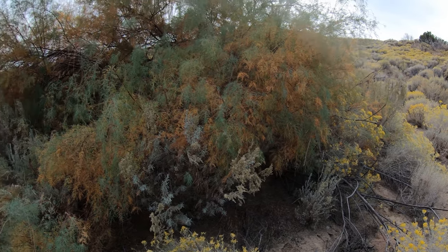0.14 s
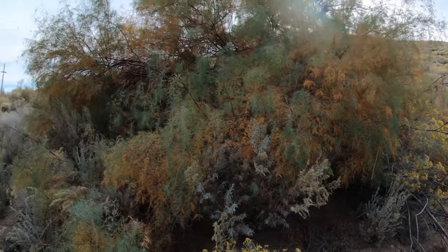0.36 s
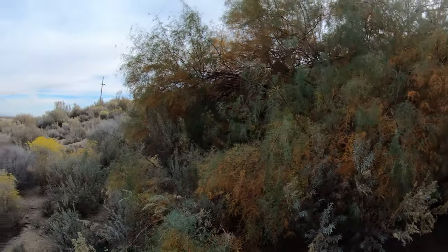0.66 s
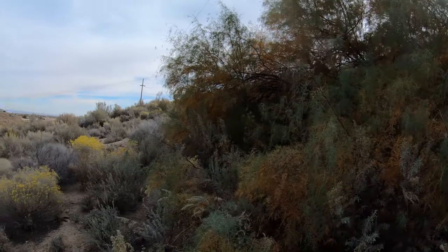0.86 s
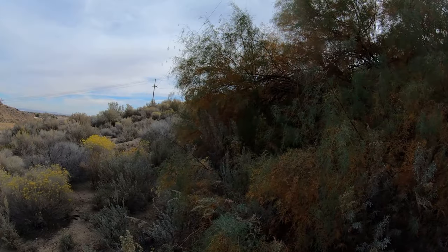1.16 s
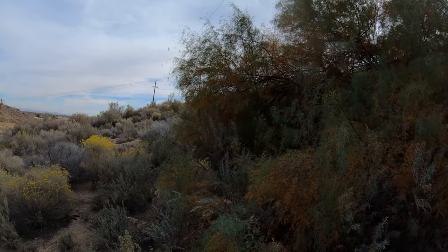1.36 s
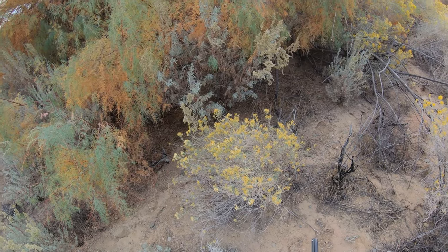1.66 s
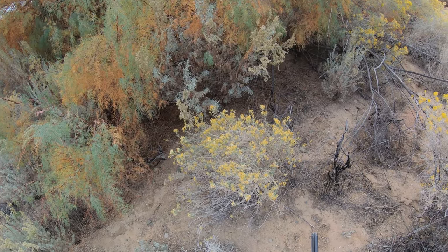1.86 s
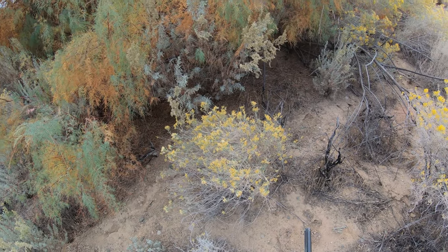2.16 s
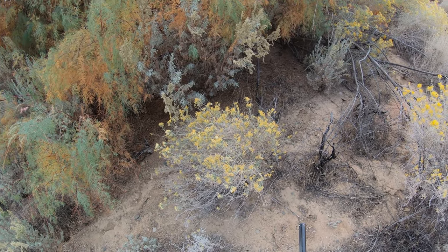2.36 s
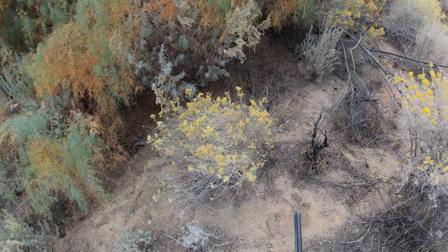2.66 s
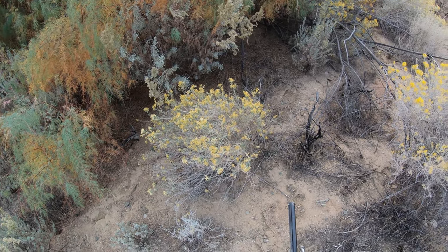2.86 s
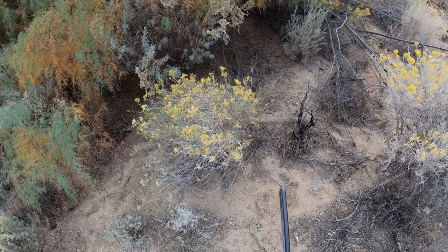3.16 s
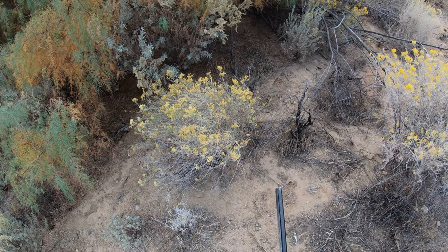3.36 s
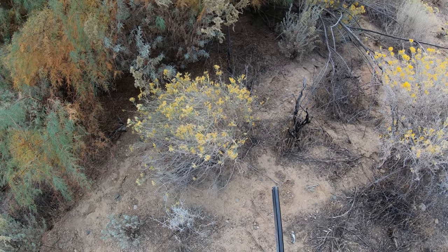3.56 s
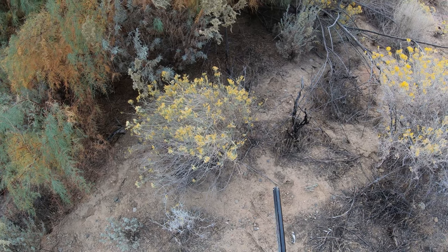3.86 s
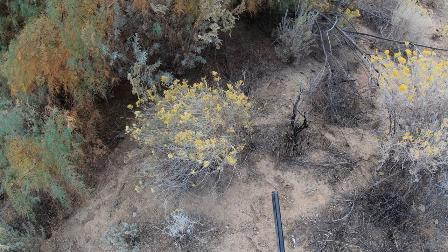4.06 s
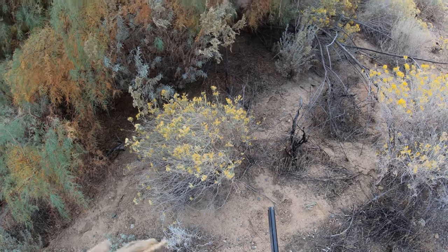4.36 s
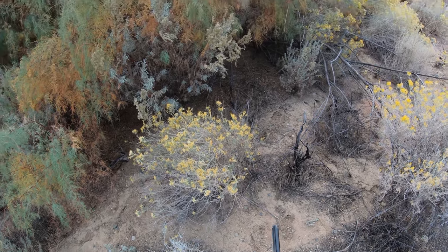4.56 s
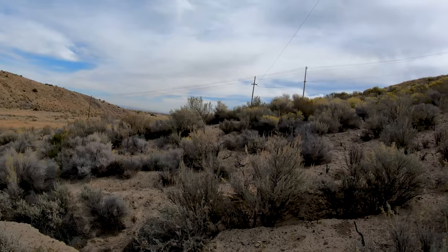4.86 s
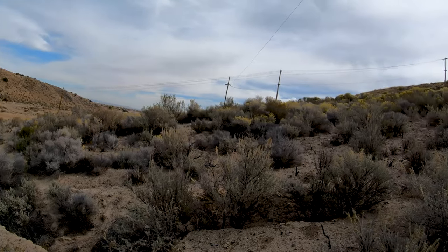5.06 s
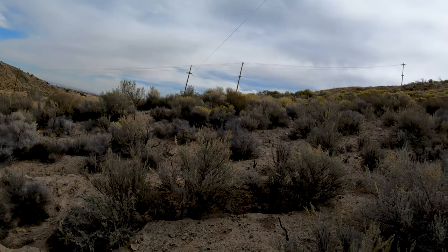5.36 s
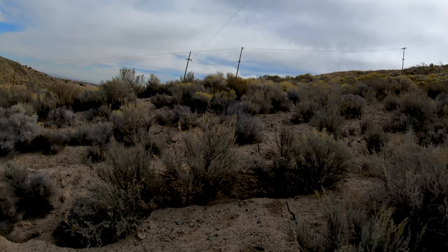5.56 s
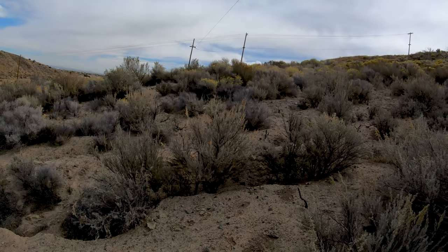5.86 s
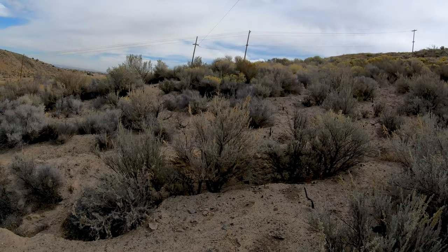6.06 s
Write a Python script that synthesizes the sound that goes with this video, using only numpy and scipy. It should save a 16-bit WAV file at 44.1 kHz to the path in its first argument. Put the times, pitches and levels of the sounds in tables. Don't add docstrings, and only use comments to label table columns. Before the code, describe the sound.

Three joined outdoor scenes with quail in bushes. Early notes are soft, the middle scene holds the clearest arched whistles, and the last has only faint, lower calls. Wind buffets the microphone steadily, with a heavy push near the end. Far traffic hums below thin leaf hiss. Close by, dry twigs snap, cloth brushes stems, and the housing ticks and thumps, mostly after four seconds.

```python
import sys
import numpy as np
from scipy import signal
from scipy.fft import rfft, irfft
from scipy.io import wavfile
from scipy.ndimage import uniform_filter1d

SR = 44100
rng = np.random.default_rng(int(sys.argv[2]) if len(sys.argv) > 2 else 0)


def waveform_to_disk(signal):
    frames = np.transpose(np.atleast_2d(signal))
    scaled = np.clip(frames, -1, 1) * 32767
    samples = np.round(scaled).astype(np.int16)
    wavfile.write(sys.argv[1], SR, samples)


def to_linear_factor(level_db):
    exponent = np.asarray(level_db, float) / 20
    return 10 ** exponent


N = 274302


def level(x, db):
    return x * to_linear_factor(db) / np.sqrt(np.mean(x ** 2))


def shaped(points, lo_hz, hi_hz):
    f = np.fft.rfftfreq(N, 1 / SR) + 0.18
    point_hz, point_db = np.array(points, float).T
    gain = to_linear_factor(np.interp(np.log(f), np.log(point_hz), point_db))
    gain = gain / np.sqrt((1 + (lo_hz / f) ** 8) * (1 + (f / hi_hz) ** 8))
    return level(irfft(rfft(rng.standard_normal(N)) * gain, N), 0)


def walk(rate, n):
    hold = int(SR / rate)
    steps = np.repeat(rng.standard_normal(n // hold + 1), hold)
    return 1.12 * uniform_filter1d(uniform_filter1d(steps, hold), hold)[:n]


def band(x, hz, width_hz):
    lo = max(hz - width_hz / 2, hz / 5)
    hi = min(hz + width_hz / 2, .45 * SR)
    return signal.sosfilt(signal.butter(2, [lo, hi], "band", fs=SR, output="sos"), x)


def add(out, x, s):
    i = max(int(s * SR), 0)
    out[i:i + len(x)] += x[:N - i]


# t/s, step in signal level
SPLICES = [
    (1.596, .01),
    (4.849, -.016),
]


def splices():
    out, t = np.zeros(N), np.arange(N) / SR
    for s, step in SPLICES:
        out += step * (t >= s) * np.exp(-np.abs(t - s) / 0.016)
    return out


def spans():
    cuts = [0] + [s for s, _ in SPLICES] + [np.inf]
    return list(zip(cuts, cuts[1:]))


# f/Hz, level/dB per Hz
AIR_FIRST = [(18, -44), (30, -6.5), (75, -1.5), (167, -18), (322, -26.5), (429, -31), (476, -31),
             (608, -31.5), (916, -22), (1350, -25.5), (1880, -34), (4000, -53), (5200, -87), (8800, -120)]
AIR_SECOND = [(18, -22), (30, 3), (71, -2), (139, -6), (189, -18), (247, -23), (350, -27.5), (457, -25.5),
              (827, -20), (1320, -23.5), (1660, -26), (4000, -44.5), (5200, -81), (8800, -120)]
AIR_THIRD = [(18, -31), (30, -12), (55, -3.5), (71, -8.5), (193, -22.5), (237, -27.5), (297, -30),
             (372, -29), (844, -24), (935, -19.5), (1410, -20.5), (4000, -41), (5200, -73), (8800, -120)]
AIR = (AIR_FIRST, AIR_SECOND, AIR_THIRD)
# t/s, level/dB
ROAD = [
    [(0, -48.5), (.06, -55.5), (.42, -56), (.54, -50.5), (.9, -54.5), (1.2, -54.5), (1.59, -54.5)],
    [(1.59, -54.5), (2.14, -52), (2.6, -54), (2.9, -56), (3.3, -53.5), (3.68, -57), (4.05, -54.5),
     (4.7, -57)],
    [(4.85, -50), (5.36, -54), (5.85, -51), (6.05, -52.5)],
]


def road():
    out, t = np.zeros(N), np.arange(N) / SR
    for curve, colour, (start, end) in zip(ROAD, AIR, spans()):
        road_db = np.interp(t, *np.transpose(curve))
        hum = to_linear_factor(road_db - 1.5 + 0.4 * walk(6, N)) * shaped(colour, 246, 1355)
        tyres = to_linear_factor(road_db - 10 + 0.76 * walk(5.69, N)) * shaped(colour, 1676, 3500)
        out += (hum + tyres) * ((t >= start) & (t < end))
    return out


# f/Hz, level/dB per Hz
HISS = [(1470, -37), (2500, -12), (2980, -7), (4230, -7), (15000, -12.5), (15500, -12.5)]
LEAVES_DB = (-69.5, -69, -68)
LEAF_SHARE, ROAD_MEAN_DB = 0.084, -54


def leaves():
    out, t = np.zeros(N), np.arange(N) / SR
    for leaves_db, curve, (start, end) in zip(LEAVES_DB, ROAD, spans()):
        road_db = np.interp(t, *np.transpose(curve))
        hiss_db = leaves_db + LEAF_SHARE * (road_db - ROAD_MEAN_DB)
        hiss = to_linear_factor(hiss_db + 0.5 + 0.81 * walk(14, N)) * shaped(HISS, 2860, 20200)
        out += hiss * ((t >= start) & (t < end))
    return out


# t/s, level/dB
WIND = [
    [(0, -43.5), (.5, -39.5), (1.2, -45), (1.43, -43.5), (1.59, -43.5)],
    [(1.59, -41), (1.7, -39.5), (1.87, -41.5), (2.1, -41), (2.9, -40.5), (3.6, -42), (3.85, -44),
     (4.7, -43.5), (4.85, -47.5)],
    [(4.85, -43), (5.08, -51), (5.34, -47), (6.22, -49.5)],
]
# t/s, half length/s, level/dB
GUSTS = [(0, 0.66, -35.5), (1.05, 0.48, -43.5), (1.486, 0.078, -38), (1.98, .2, -44), (2.55, 0.21, -42.5),
         (2.937, .08, -44), (3.678, 0.074, -45), (4.27, 0.27, -41.5), (4.954, 0.17, -39), (5.33, 0.18, -37),
         (5.808, 0.39, -28.5), (6.2, .15, -40.5)]
CALM_DB = -51


def wind():
    out, t = np.zeros(N), np.arange(N) / SR
    swell = to_linear_factor(CALM_DB)
    for s, half, db in GUSTS:
        swell = swell + to_linear_factor(db) * np.cos(np.pi / 2 * np.clip((t - s) / half, -1, 1)) ** 2
    for curve, colour, (start, end) in zip(WIND, AIR, spans()):
        rumble_db = np.interp(t, *np.transpose(curve))
        heave = shaped([(2, -1.0), (10, 1.0), (30, -15)], 1.21, 26.6)
        blow = swell * to_linear_factor(2.5) * np.tanh(heave)
        blow += to_linear_factor(rumble_db - 1.5 + 1.0 * walk(9, N)) * shaped(colour, 28.0, 278)
        out += blow * np.clip(np.minimum(t - start, end - t) / 0.0038, 0, 1)
    return out


# centre t/s, half length/s, level/dB, centre f/Hz, width f/Hz
RUSTLES = [(0.22, .03, -70, 5530, 2520), (0.597, 0.28, -68.5, 2600, 1500), (1.237, .13, -75, 5500, 1500),
           (1.656, .14, -69.5, 4470, 3000), (2.13, 0.096, -69.5, 7000, 6000),
           (3.206, 0.035, -71, 6460, 1200), (3.575, 0.022, -69.5, 6000, 1200),
           (3.741, 0.07, -68, 5030, 4000), (3.83, 0.044, -74, 7500, 1500),
           (4.253, 0.062, -69.5, 5840, 2000), (5.605, 0.02, -67.5, 4500, 3500),
           (6.204, .03, -63.5, 4000, 3000), (5.7, .05, -69, 6000, 5000), (5.823, 0.045, -62.5, 4750, 5000)]


def rustles():
    out = np.zeros(N)
    for s, length, db, hz, width_hz in RUSTLES:
        n = int(2 * length * SR)
        grains = rng.standard_normal(n) * to_linear_factor(5.1 * walk(300, n))
        add(out, level(band(grains, hz, width_hz), db) * np.hanning(n), s - length)
    return out


def ticks(table):
    out, t = np.zeros(N), np.arange(2048) / SR
    for s, db, hz, share, ring in table:
        noise = rng.standard_normal(len(t))
        push = noise * to_linear_factor(-60 * t / max(ring, .001)) + 7.1 * (t == 0)
        snap = band(push, hz, hz * np.clip(share, .08, 1.6))
        add(out, snap * to_linear_factor(db) / np.abs(snap).max(), s)
    return out


# t/s, peak level/dB, centre
# f/Hz, width as share of centre, ring/s
KNOCKS = [(3.866, -45, 1000, .5, .015), (4.782, -38, 1100, .3, .015), (5.82, -40, 800, 1.2, .012),
          (5.797, -43, 600, .9, .015), (5.253, -41, 780, .3, .025), (5.504, -40, 480, .9, .03),
          (1.596, -50, 400, 1.2, .02)]


def knocks():
    return ticks(KNOCKS)


# t/s, peak level/dB, centre f/Hz, width as share of centre
PINGS = [(1.597, -52.5, 3900, .15), (2.78, -51, 4400, .3), (3.8668, -49.5, 5200, .1),
         (3.867, -49, 3180, 0.27), (4.1045, -53, 5100, .3), (4.4437, -45, 7800, 0.32),
         (4.47, -56, 4800, .3), (4.548, -51, 4600, 0.2), (4.548, -51, 7300, 0.26), (4.739, -56, 7500, 0.27),
         (4.748, -58, 7500, .15), (4.753, -59, 7500, .15), (4.782, -38, 6300, .35),
         (4.7825, -46.5, 9800, 0.25), (4.797, -47, 6700, .36), (4.831, -48, 7600, .4),
         (5.204, -51, 4100, .2), (5.208, -50, 5000, .15)]
PING_RING_S = 0.011


def fittings():
    return ticks([(*row, PING_RING_S) for row in PINGS])


# t/s, peak level/dB, centre f/Hz
SNAPS = [(.8105, -50, 3300), (2.122, -56, 4000), (4.217, -53, 6000), (4.4072, -35.5, 10700),
         (4.4575, -54, 9000), (4.4705, -55, 8000), (4.539, -54, 7000), (4.568, -44, 7000),
         (4.59, -47, 4760), (4.559, -50, 3300), (4.8035, -48, 9000), (4.819, -50, 7500),
         (4.8472, -45, 8000), (5.596, -52, 4300), (5.608, -54, 4500), (5.711, -45, 3970), (5.75, -49, 5500),
         (5.799, -52, 4500), (5.813, -49, 4600), (5.83, -43, 5470)]
SNAP_SHARE, SNAP_RING_S = .55, .005


def twigs():
    return ticks([(*row, SNAP_SHARE, SNAP_RING_S) for row in SNAPS])


def ease(u, bend):
    u = np.clip(u, 0, 1) ** 2
    return u / (1 - bend * (1 - u))


ATTACK_S, EDGE_DB, DULL_DB = .009, 13, 4


def arch(shape, start, top, end, top_hz, db):
    rise, rise_bend, fall, fall_bend, sag_db, release = shape
    t = np.arange(start, end, 1 / SR)
    up = ease((top - t) / (top - start), rise_bend)
    down = ease((t - top) / (end - top), fall_bend)
    edge = np.clip(np.minimum((t - start) / ATTACK_S, (end - t) / release), 0, 1)
    hz = top_hz * (1 - rise * up - fall * down)
    loud_db = db - sag_db * (up + down) - EDGE_DB * (1 - edge)
    return hz, loud_db, -DULL_DB * (up + down)


# f/Hz, level/dB
THROAT = [(600, -15), (1000, -5), (1200, -3), (1600, -2), (2300, 0), (2800, -10), (3500, -13), (4000, -26),
          (4700, -25), (5200, -24), (5800, -6), (6100, -12), (6500, -26), (7100, -24)]
# start drop as share, rise ease, end drop as share, fall ease, sag level/dB, release/s
CHIP = (.4, .35, .38, .25, 10, .008)
SLOWER = (.29, .5, .25, -2.5, 5, .006)
DIP = (.02, .2, .17, .5, 1, .008)
LONG = (.41, -.6, .36, -3.6, 8, .005)
TAIL = (.36, .45, .33, .89, 7, .02)
HIGH = (.25, -.3, .33, .5, 11, .012)
FAR = (.34, -.3, .24, -.3, 7, .02)
HELD = (.33, -1.8, .065, .6, 4, .004)
SLUR = (.08, .2, .39, .8, 4, .015)
DROOP = (.03, .2, .14, .3, 1, .03)
# arch, start t/s, top t/s, end t/s, top f/Hz, second partial level/dB
BIRDS = [
    ((6.7, -1.4, -8), [(CHIP, 0, .038, .075, 1145, -53.5)]),
    ((7.8, -6, 0), [(LONG, .185, .29, .358, 1174, -54), (TAIL, .435, .476, .552, 1196, -56.5)]),
    ((3.7, -10.5, -26), [(SLOWER, 2.29, 2.425, 2.478, 1070, -55.5), (HELD, 2.585, 2.628, 2.67, 1135, -52.5), (SLUR, 2.664, 2.682, 2.76, 1165, -59)]),
    ((-1, -6.5, -17), [(CHIP, 3.185, 3.233, 3.28, 1180, -48), (HIGH, 3.63, 3.669, 3.73, 1350, -56)]),
    ((0.72, -12, -13), [(LONG, 3.385, 3.487, 3.549, 1215, -48.5)]),
    ((4.3, -23, -24), [(FAR, 5.14, 5.225, 5.33, 988, -55), ]),
    ((-4, -6, -22), [(HIGH, 6.175, 6.225, 6.3, 890, -55)]),
    ((-3, -8, -22), [(CHIP, 4.885, 4.933, 4.975, 870, -57.5)]),
    ((-8, -2.5, -22), [(DROOP, 5.478, 5.495, 5.6, 772, -64)]),
    ((-20, -20, -30), [(DIP, 4.442, 4.446, 4.47, 1220, -61), (DIP, 1.612, 1.625, 1.645, 2080, -72)]),
]
SHIMMER_DB, WOBBLE = 1.5, .004
ECHO_DB, ECHO_T60_S = -15, 0.36


def quail():
    out, throat = np.zeros(N), np.array(THROAT, float)
    for (first_db, third_db, high_db), notes in BIRDS:
        for shape, start, top, end, top_hz, db in notes:
            hz, loud_db, dull_db = arch(shape, start, top, end, top_hz, db)
            n = len(hz)
            pitch = uniform_filter1d(hz, size=300, mode="nearest") * (1 + WOBBLE * walk(102.4, SR // 2)[:n])
            phase = 2 * np.pi * np.cumsum(pitch) / SR
            high = high_db + dull_db
            partials_db = (first_db + dull_db, 0, third_db + dull_db, high, high, high)
            voice = 0
            for k, own_db in enumerate(partials_db, start=1):
                mouth_db = np.interp(k * pitch, *throat.T) - np.interp(2 * pitch, *throat.T)
                shimmer_db = SHIMMER_DB * walk(68, SR // 2)[:n]
                voice = voice + to_linear_factor(own_db + mouth_db + shimmer_db) * np.sin(k * phase)
            add(out, np.sqrt(2) * voice * to_linear_factor(loud_db), start)
    t = np.arange(SR // 2) / SR
    tail = rng.standard_normal(len(t)) * to_linear_factor(-60 * t / ECHO_T60_S) * np.clip(t / 0.019, 0, 1)
    return out + to_linear_factor(ECHO_DB) * signal.fftconvolve(out, tail / np.linalg.norm(tail))[:N]


def scene():
    background = splices() + road() + leaves() + wind()
    close = rustles() + knocks() + fittings() + twigs()
    return (background + close + quail())[None, :]


def band_limit(x):
    return signal.sosfilt(signal.butter(12, 16040, fs=SR, output="sos"), x)


TOP_HZ, OFFSET = 15790, -0.0022


def record(dry):
    cut = signal.sosfilt(signal.ellip(12, .1, 60, TOP_HZ, fs=SR, output="sos"), dry)
    return band_limit(cut + OFFSET)


dry = scene()
out = record(dry)
waveform_to_disk(out)
```